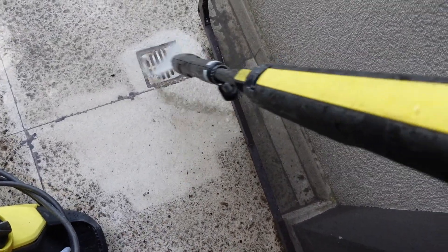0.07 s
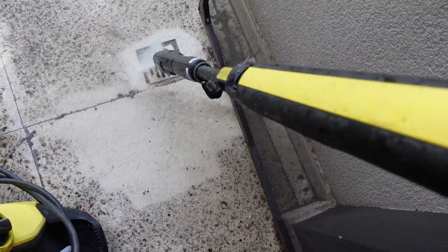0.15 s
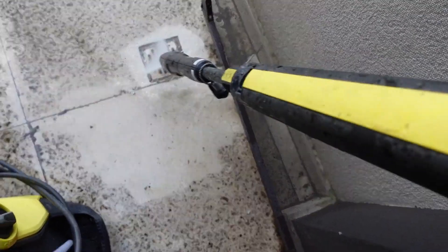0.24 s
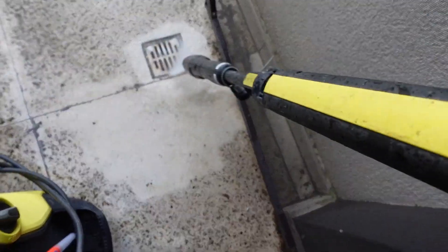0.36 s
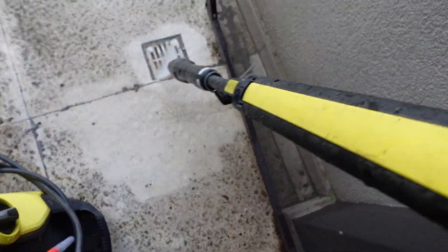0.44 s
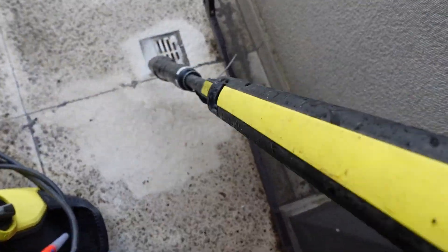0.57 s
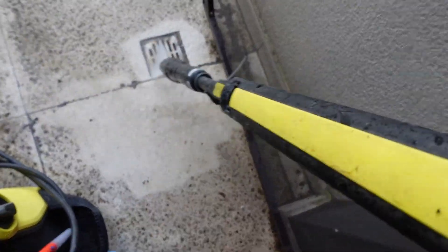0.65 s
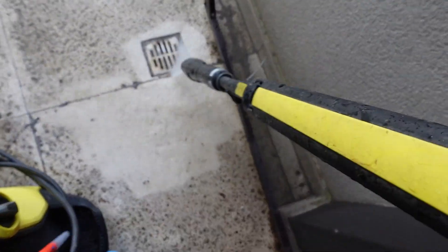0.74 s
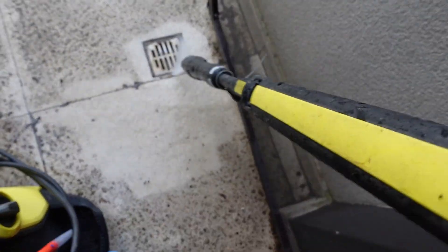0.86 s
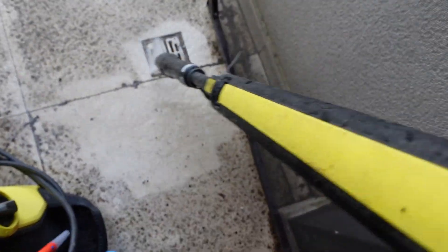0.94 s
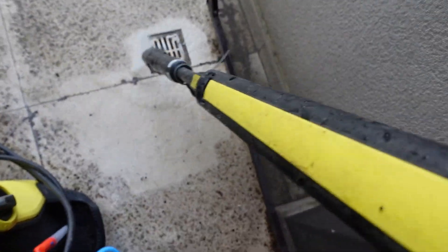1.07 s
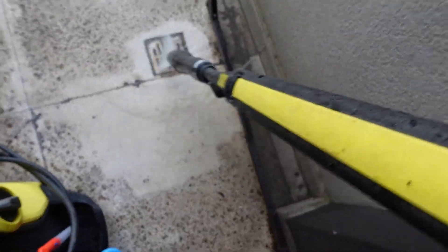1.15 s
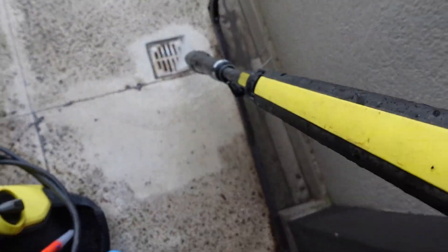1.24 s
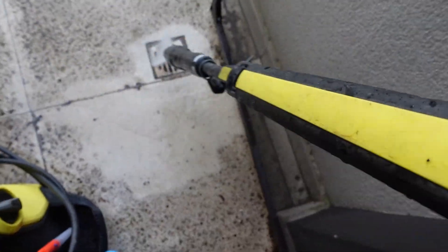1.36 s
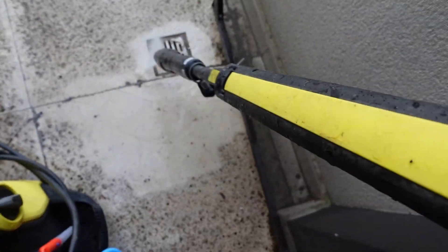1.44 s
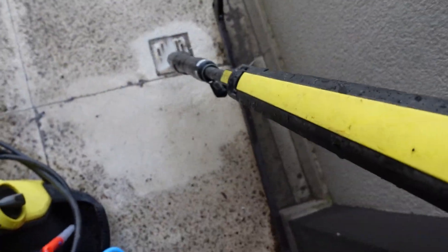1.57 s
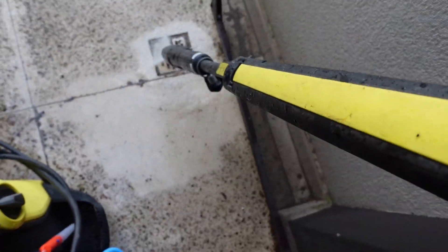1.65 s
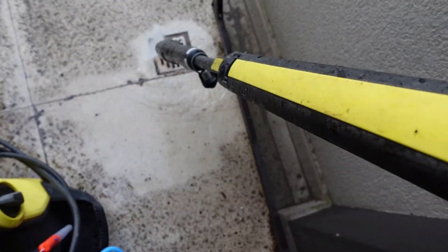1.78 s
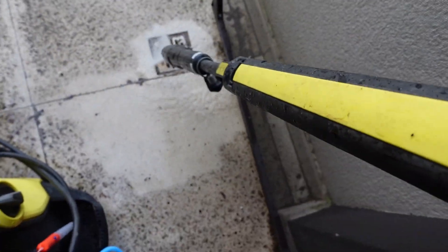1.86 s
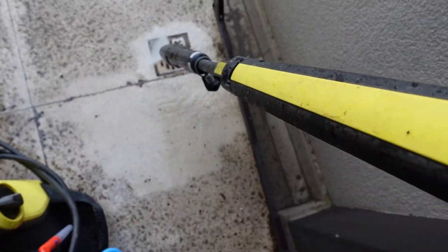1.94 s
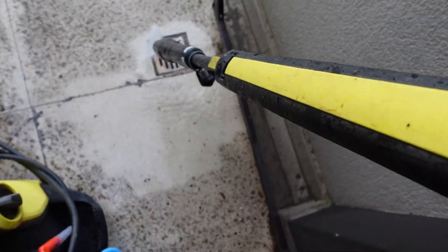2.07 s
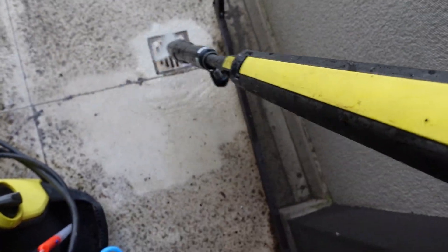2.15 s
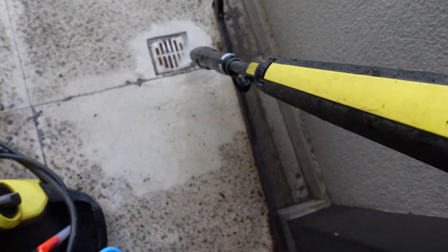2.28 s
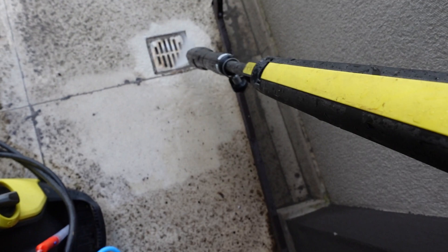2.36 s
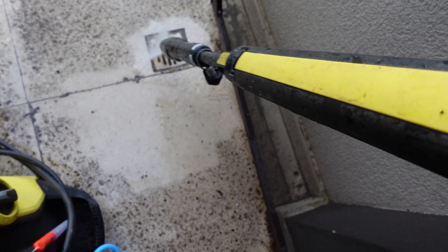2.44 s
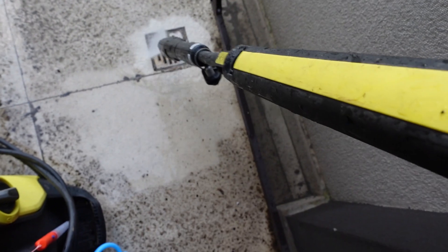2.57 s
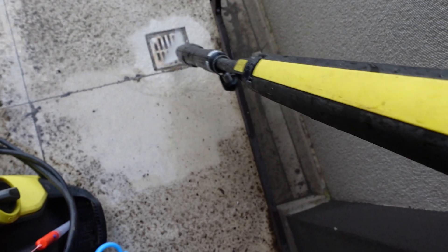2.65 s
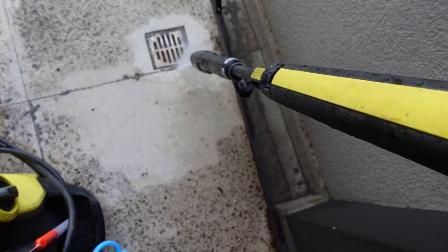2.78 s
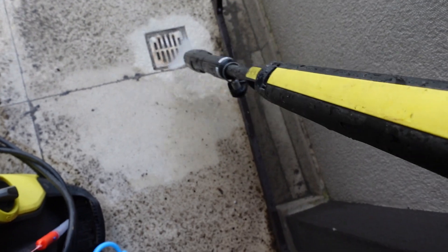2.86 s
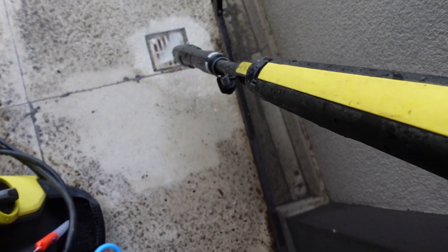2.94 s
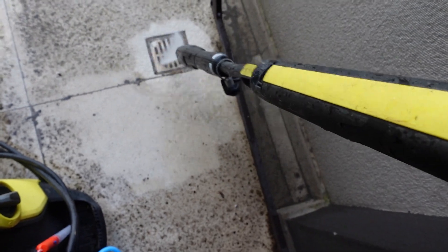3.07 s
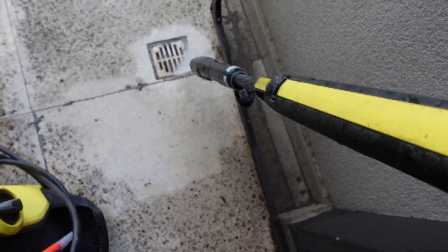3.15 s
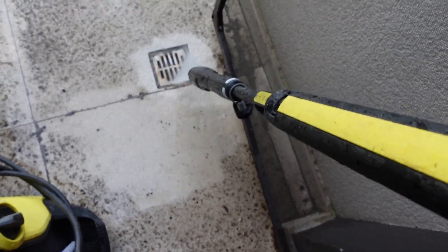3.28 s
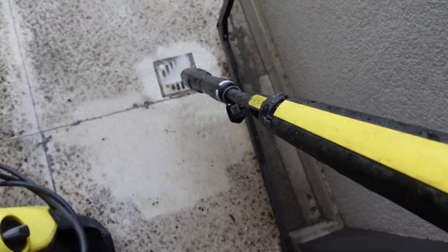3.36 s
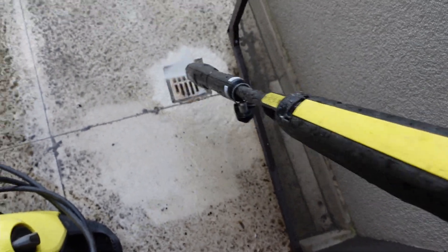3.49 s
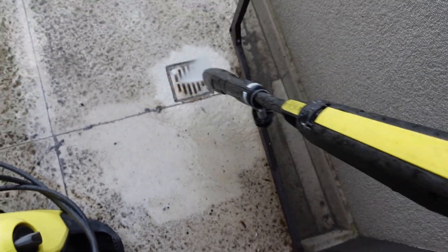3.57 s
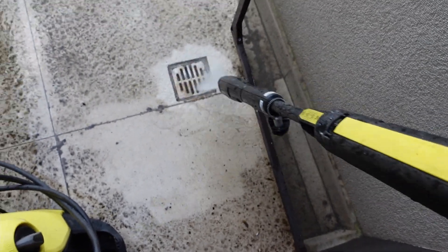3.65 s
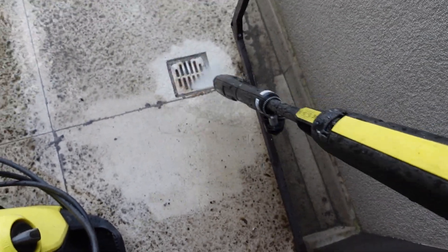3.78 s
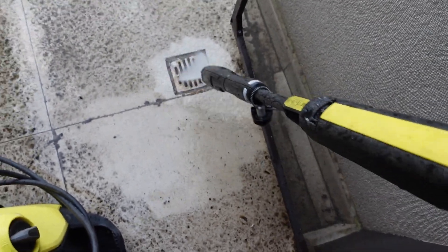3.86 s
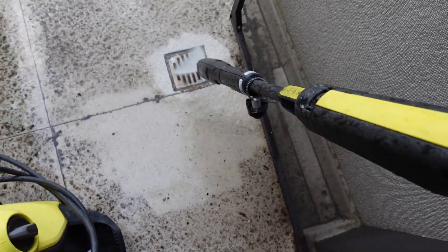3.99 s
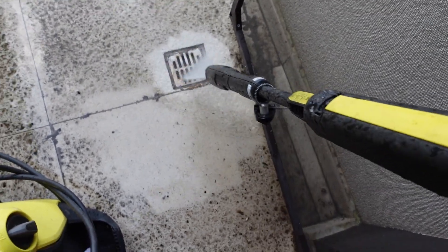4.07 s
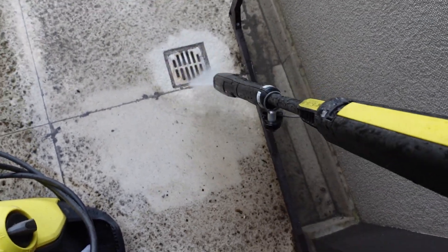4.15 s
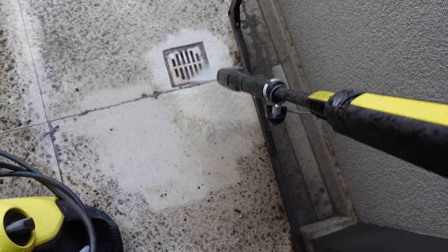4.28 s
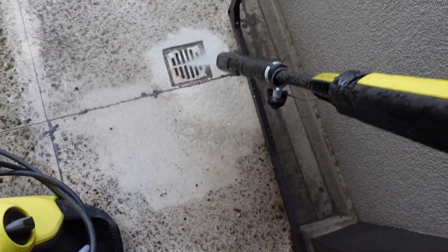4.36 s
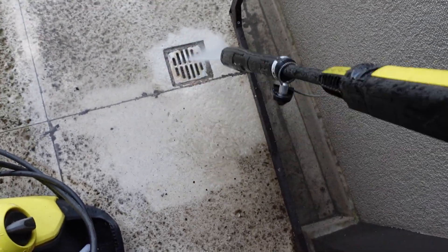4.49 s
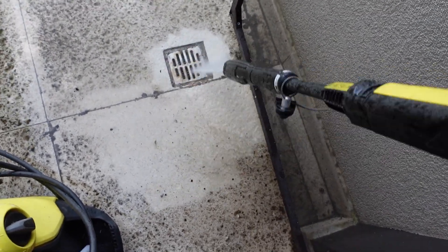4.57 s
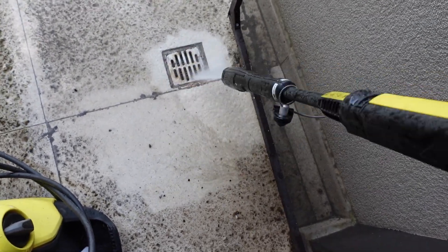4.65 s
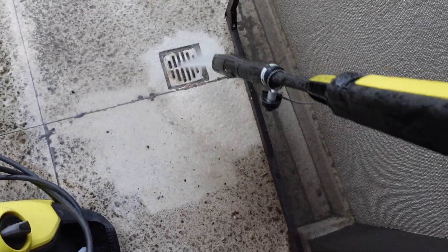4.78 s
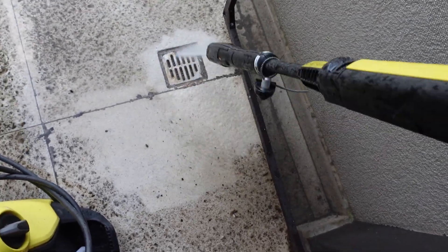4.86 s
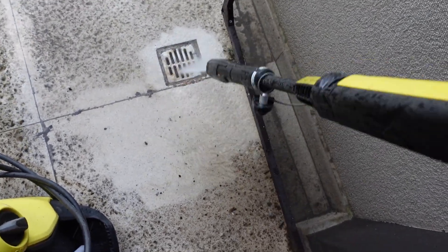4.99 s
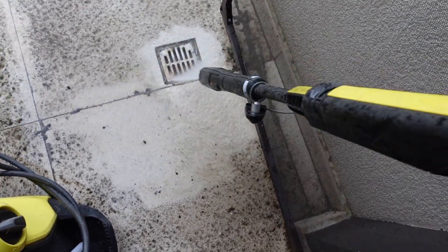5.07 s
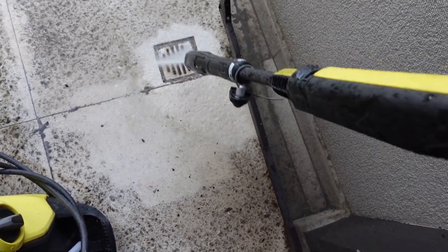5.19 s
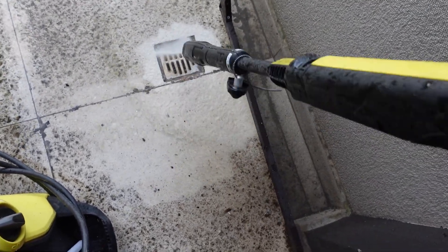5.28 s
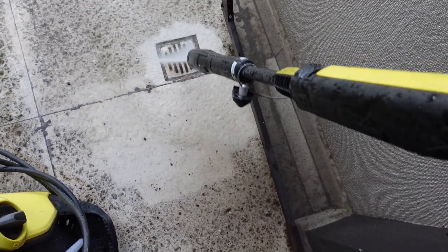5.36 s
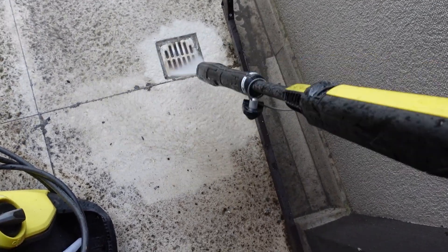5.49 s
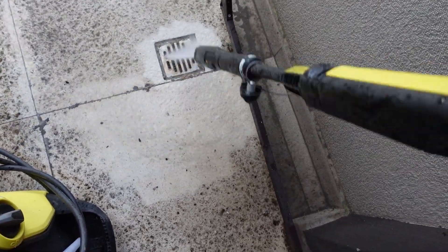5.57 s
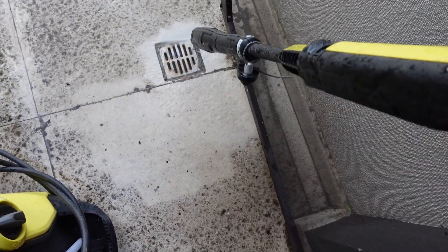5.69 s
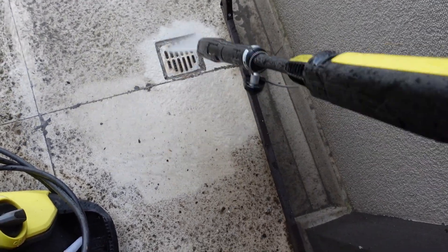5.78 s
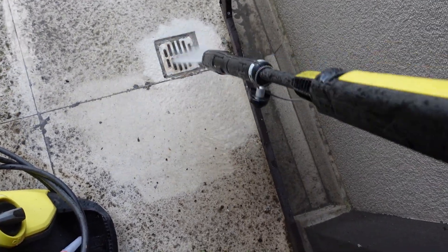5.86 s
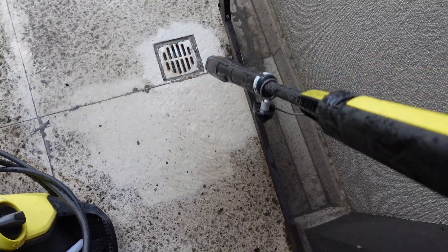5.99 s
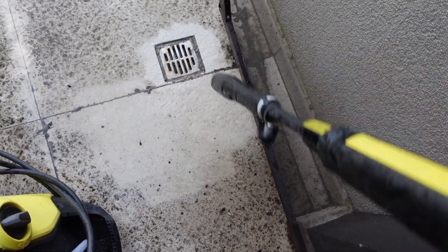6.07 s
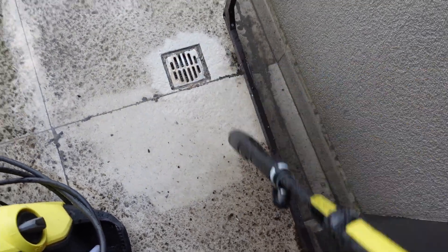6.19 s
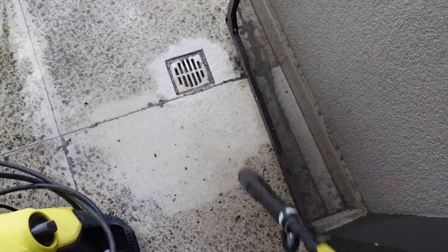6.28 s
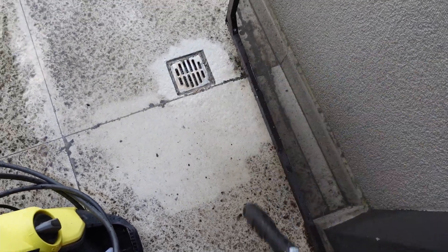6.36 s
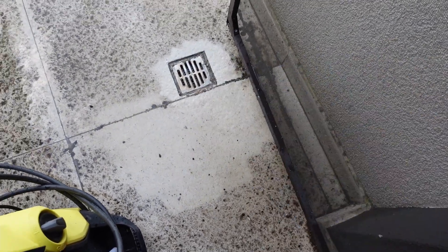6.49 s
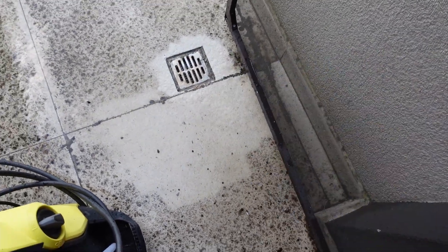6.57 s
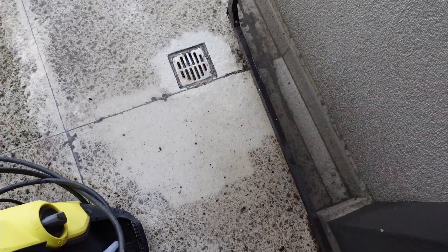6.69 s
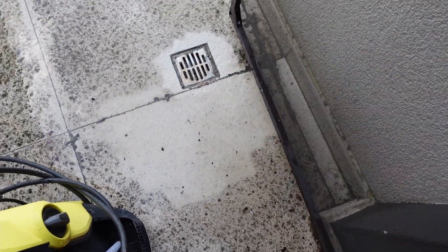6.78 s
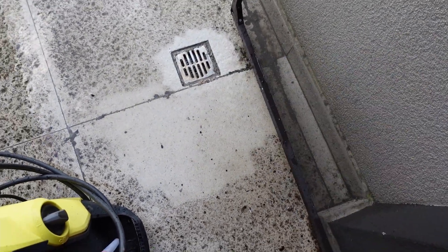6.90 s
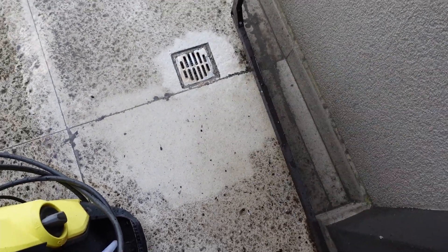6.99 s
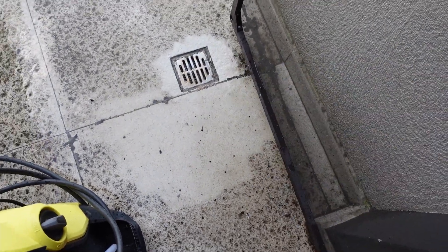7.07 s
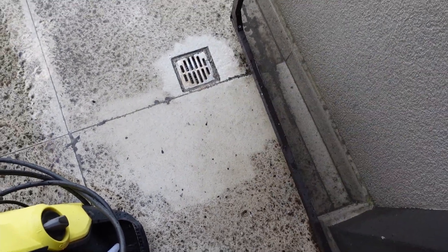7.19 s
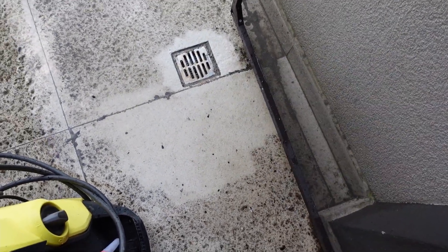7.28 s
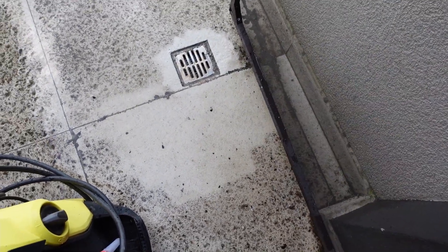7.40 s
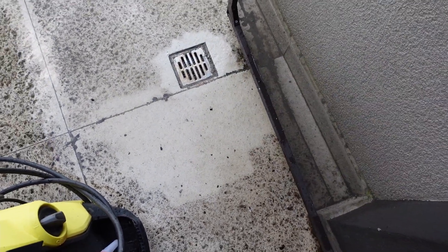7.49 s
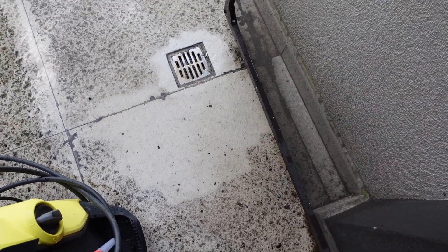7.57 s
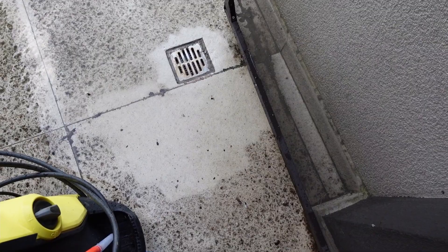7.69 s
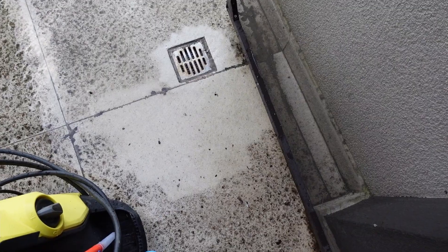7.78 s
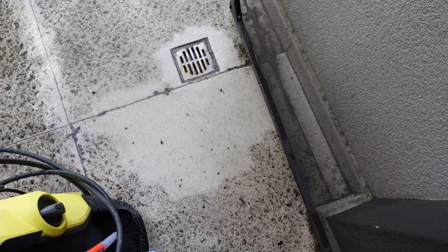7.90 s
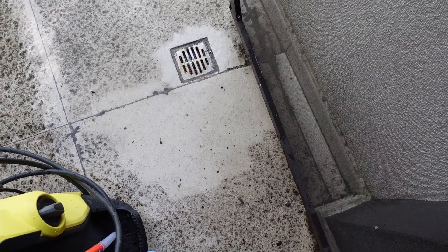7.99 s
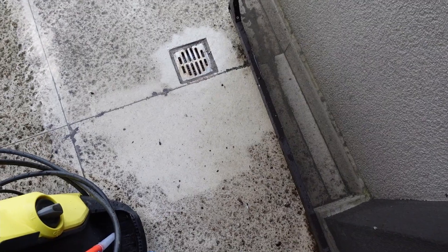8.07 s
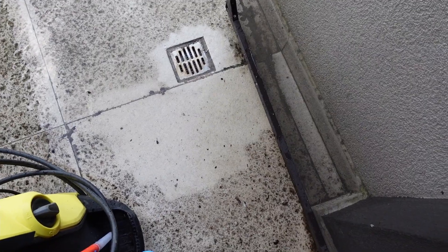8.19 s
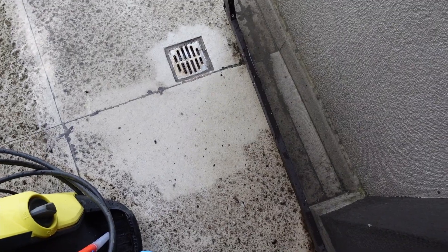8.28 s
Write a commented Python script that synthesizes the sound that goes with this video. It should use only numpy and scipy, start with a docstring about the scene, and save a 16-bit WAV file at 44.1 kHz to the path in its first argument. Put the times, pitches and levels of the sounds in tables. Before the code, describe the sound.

From the start an electric pressure washer runs on a walled outdoor terrace, its pump droning and rattling steadily. Close by, the water jet hisses loudly, its tone shifting as it swings, slapping wet tiles, ringing a drain grate and churning in the drain with low gulps. At about 6 seconds the jet cuts off; the pump hammers for an instant and stops, and the walls echo briefly while water fizzes away. The rest is much quieter. At 6.7 seconds the plastic spray wand knocks with a quick chatter, followed by soft rustling. A soft step comes at 7.2 seconds, one faint drip at 7.7 and a faint airy hiss at 7.9. Around 8.1 seconds the hose coupling gives a few quick, sharp clicks, with two more soft steps. From about 7 seconds a faint distant rumble slowly grows until the end.

```python
"""An electric pressure washer drones and rattles on a walled terrace as its piston pump turns.
Its swinging jet breaks into drops that hiss on the tiles, ring a grate and churn in the drain.
Near six seconds the trigger is let go: the jet cuts off, the pump labours against the shut valve
and stops, and the walls ring out. In the quiet the plastic lance (the spray wand) knocks and the hose
coupling clicks, among soft rustles, a breathy hiss, steps, one drip and a slowly growing far rumble."""
import sys
import numpy as np
from scipy import signal
from scipy.fft import rfft, irfft, next_fast_len
from scipy.io import wavfile
from scipy.ndimage import uniform_filter1d, map_coordinates

SR = 44100
rng = np.random.default_rng(int(sys.argv[2]) if len(sys.argv) > 2 else 0)


def store_wav(level_fs):
    """Save 16-bit WAV to argv[1]."""
    pcm = np.round(np.clip(np.atleast_2d(level_fs), -1, 1) * 32767)
    wavfile.write(sys.argv[1], SR, pcm.T.astype(np.int16))


N = 367794
T = np.arange(N) / SR
RELEASE_S, STALL_S = 5.982, 6.062  # the trigger valve shuts; the pressure switch stops the motor

# the tones of the pump's drone: (pitch [times the shaft speed], level [dB])
PUMP_TONES = [(3, -47.7), (5, -47.5), (6, -31.0), (7, -42.6), (8, -44.8), (9, -33.7), (10, -43.1),
              (11, -31.0), (12, -36.1), (13, -24.5), (14, -35.2), (15, -35.7), (17, -36.5), (18, -34.0),
              (19, -42.5), (21, -44.9), (22, -44.7), (23, -41.6), (24, -41.2), (25, -46.2), (27, -40.7),
              (29, -47.3), (30, -39.7), (31, -46.9), (33, -44.7), (34, -47.4), (35, -45.2), (36, -45.4),
              (37, -47.4), (41, -44.2)]
# mains hum and motor whine: (pitch [Hz], level [dB])
MOTOR_TONES = [(100, -63.5), (200, -46.5), (1526, -53.5), (1907, -43)]
# the pump housing, shaken by the valves: (frequency [Hz], level [dB])
HOUSING_SPECTRUM = [(20, -38.5), (65, -36.5), (110, -22.5), (190, -14), (290, -5), (430, -0.5), (550, 0.5),
                    (680, -5), (1000, -12), (1800, -8.5), (4000, -17), (9000, -30.5), (16000, -43.5)]
# the jet's hiss: (frequency [Hz], level [dB])
HISS_SPECTRUM = [(200, -34.5), (700, -15.5), (1300, -4), (2100, -6), (2450, -5), (3300, 1), (4600, -2),
                 (5400, -2), (7500, -5), (10000, -10), (16000, -29)]
# aiming the lance shifts the hiss between two peaks: (time [s], share of the upper peak [0-1])
HISS_AIM = [(0, 0.5), (.6, 0.5), (.93, 0.2), (1.07, 0.9), (1.8, 0.7), (2.1, 0.8), (3.05, 0.5), (3.95, .3),
            (4.3, 0.8), (4.85, 0.8), (5.35, 0.3), (5.6, .2), (5.82, 0.9)]
# water hitting stone: (frequency [Hz], level [dB])
STONE_SPECTRUM = [(400, -29), (800, 0.5), (1250, 1), (2100, 0), (2400, -6.5), (4000, -21.5)]
# the jet slaps squarely on wet stone: (middle time [s], length [s], level [dB])
STONE_SLAPS = [(.35, .16, -27), (1.61, 0.15, -22), (2.27, 0.34, -26), (2.65, 0.13, -26.5),
               (3.06, 0.23, -22), (3.95, 0.38, -25)]
# the ringing slots of the grate: (pitch [Hz], width [Hz], level [dB])
GRATE_RING = [(2810, 290, 0)]
# the jet crosses the grate: (middle time [s], length [s], level [dB])
GRATE_CROSSINGS = [(.65, .2, -25), (1.03, .16, -22.5), (1.52, 0.45, -23), (1.88, 0.37, -24),
                   (2.17, .16, -23.5), (2.58, .24, -22), (3.04, .22, -25.5), (3.5, .12, -28.5),
                   (4.05, .14, -30.5), (4.86, .1, -27), (5.45, .14, -30.5), (5.86, .1, -29)]
# the finest spray: (frequency [Hz], level [dB])
SPRAY_SPECTRUM = [(4000, -29.5), (8000, -2), (10000, 0), (13000, -0.5), (16000, -16.5)]
# the shape of the spray's rise and fall: (time [s], level [dB])
SPRAY_SHAPE = [(0.0, -26), (0.11, -29.5), (0.78, -28), (3.91, -30.5), (4.57, -26), (5.5, -29.5),
               (5.75, -26.5), (5.95, -27.5)]
# the hollow of the drain: (pitch [Hz], width [Hz], level [dB])
DRAIN_RING = [(407, 130, 0.5), (550, 190, -1.5)]
# water plunges into the drain with a low gulp: (middle time [s], length [s], level [dB])
DRAIN_GULPS = [(.2, 0.41, -23.5), (.98, 0.07, -28.5), (1.39, 0.043, -18.5), (1.69, 0.089, -23),
               (1.96, .08, -20), (2.17, 0.037, -22.5), (2.51, 0.046, -22), (2.9, .06, -23.5),
               (3.42, 0.1, -22), (3.65, 0.12, -25.5), (3.98, 0.19, -22), (4.23, .06, -24),
               (4.91, .08, -23.5), (5.3, 0.15, -21.5), (5.68, .08, -23.5), (5.82, 0.066, -25)]
# a piston stroke against the shut valve: (frequency [Hz], level [dB])
STROKE_SPECTRUM = [(40, -43.5), (75, -31), (120, -11.5), (250, 0), (520, 2.5), (800, -2), (1500, -7.5),
                   (4000, -31.5), (12000, -54)]
# water fizzing away over the tiles: (pitch [Hz], width [Hz], level [dB])
FIZZ_BAND = [(3900, 2400, 0)]
# how long the terrace walls echo: (frequency [Hz], time to fade by 60 dB [s])
WALL_FADES = [(100, .55), (500, .5), (2000, .55), (5000, .5), (8000, .38), (11000, .27), (15000, .18)]
# the plastic lance: (pitch [Hz], width [Hz], level [dB])
LANCE_RING = [(420, 120, -2), (850, 350, -4), (1180, 260, -2), (1480, 420, 0), (2380, 500, -9),
              (3800, 1600, -13), (6800, 3000, -27)]
# rustles and a breathy hiss: (start [s], time to fade by 60 dB [s], level [dB], pitch [Hz], width [Hz])
SWISHES = [(6.71, 1.23, -54.5, 1750, 3000), (7.42, 1.25, -61.5, 4270, 3000), (7.87, .5, -52, 1490, 1415)]
# soft steps: (time [s], level [dB])
STEPS = [(7.247, -52), (8.075, -55), (8.175, -50)]
# the slab underfoot: (pitch [Hz], width [Hz], level [dB])
SLAB_RING = [(110, 26, -6), (185.7, 75, -5)]
# a drop lands on wet stone: (time [s], level [dB])
DRIP_TICKS = [(7.694, -60.5)]
# clicks of the hose coupling: (time [s], level [dB])
COUPLING_CLICKS = [(8.112, -38.5), (8.143, -41), (8.147, -33)]
# the hose coupling: (pitch [Hz], width [Hz], level [dB])
COUPLING_RING = [(1120, 330, -1), (1950, 260, 2), (2140, 70, 5.5), (3620, 260, -8), (4720, 250, -8),
                 (6600, 350, -12)]
# a deep, distant rumble: (frequency [Hz], level [dB])
RUMBLE_SPECTRUM = [(20, -14), (60, -8.5), (105, 5), (160, 1), (260, -3), (330, -11.5), (600, -47)]
# the rush of far-off surroundings: (frequency [Hz], level [dB])
RUSH_SPECTRUM = [(150, -11.5), (400, -2.5), (700, -1), (950, 2), (1400, -2.5), (2100, -3.5), (3000, -12.5),
                 (5000, -21.5), (6500, -30), (10000, -42.5), (15000, -51.5)]
# a far hum comes and goes: (middle time [s], length [s], level [dB])
FAR_HUMS = [(7.29, 0.16, -61.5), (7.62, 0.51, -64.5), (8.22, 0.23, -59)]
# how alike the two ears hear a sound: (frequency [Hz], likeness [0-1])
EAR_LIKENESS = [(200, 1), (380, .985), (950, .94), (2400, .93), (6000, .89), (15000, .8)]
# how the two microphones differ: (frequency [Hz], left minus right [dB])
MIC_BALANCE = [(200, 0), (300, -.7), (650, 1.2), (1200, -.4), (3500, -1), (6500, -2), (12000, 1),
               (16000, 1.2)]


def amp(db):
    """Turn decibels into a number to multiply by."""
    return 10 ** (np.asarray(db) / 20)


def unit(x):
    """Scale a sound to an average (rms) strength of 1."""
    return x / np.sqrt(np.mean(x ** 2) + 1e-20)


def along(points, hz):
    """Read between (frequency, value) points, giving each octave about equal room."""
    freqs, values = np.transpose(points)
    return np.interp(np.log(hz + 1), np.log(freqs + 1), values)


def wobble(rate):
    """A smooth random curve through `rate` random values a second."""
    knots = rng.standard_normal(int(N * rate / SR) + 4)
    places = np.arange(0, len(knots) - 1, 1 / 8)
    return np.interp(T * rate, places, map_coordinates(knots, [places]))


def until(stop, t60):
    """Full level up to `stop`, then a fade of 60 dB every t60 seconds."""
    return amp(-60 * np.maximum(T - stop, 0) / t60)


def swells(rows):
    """A loudness curve of smooth bumps; each one's length is taken at half its height."""
    t = T[::SR // 1000]
    power = sum(amp(db) ** 2 * .5 ** (2 * (2 * (t - s) / length) ** 2) for s, length, db in rows)
    return np.interp(T, t, np.sqrt(power + 1e-20))


def filtered(x, response):
    """Turn each frequency of x up or down as the filter `response` says."""
    size = next_fast_len(N + SR // 2)
    return irfft(rfft(x, size) * response(np.fft.rfftfreq(size, 1 / SR)), size)[..., :N]


def colour(points):
    """A filter that follows a spectrum table."""
    return lambda hz: amp(along(points, hz))


def body(rings, passes=1):
    """A filter for an object that rings at a few pitches; a second pass steepens the peaks."""
    return lambda hz: sum((-1) ** k * amp(db) * 1j * hz * width / (pitch**2 - hz**2 + 1j * hz * width)
                          for k, (pitch, width, db) in enumerate(rings)) ** passes


def ears(hz):
    """How much the ears share (mid) and differ (side): bass is alike in both, treble less so."""
    turn = np.arccos(np.clip(along(EAR_LIKENESS, hz), -1, 1)) / 2
    return np.array([np.cos(turn), np.sin(turn)])


def noise(response, drive=1):
    """Stereo noise of strength 1, made to flutter by `drive` and then filtered."""
    mid, side = filtered(drive * rng.standard_normal((2, N)), lambda hz: response(hz) * ears(hz))
    return unit(np.array([mid + side, mid - side]))


def struck(events, response, contact_s):
    """Short scuffs make an object ring, one for each (time, peak level) event."""
    out, t = np.zeros(N + SR), np.arange(SR // 4) / SR
    gain = response(np.fft.rfftfreq(len(t), 1 / SR))
    lead = SR // 100
    for s, db in events:
        force = np.roll(rng.standard_normal(len(t)) * amp(-60 * t / contact_s), lead)
        ring = irfft(rfft(force) * gain, len(t))
        out[round(s * SR) - lead:][:len(t)] += amp(db) * ring / np.abs(ring).max()
    return out[:N]


def pump(shaft_hz=46.5, rattle_db=-24.5, left_lead_s=.00008):
    """The shaft and motor drone, while the valves rattle the housing in two swells a turn."""
    speed = shaft_hz + .04 * wobble(3)
    angle = 2 * np.pi * np.cumsum(speed) / SR
    ear_angle = angle + np.pi * shaft_hz * left_lead_s * np.array([[1], [-1]])  # it stands to the left
    tone = lambda phase, db: np.sqrt(2) * amp(db + wobble(7)) * np.sin(phase)
    # the tones tend to crest together on each stroke; the housing scatters their timing
    drone = sum(tone(round(k) * ear_angle + rng.normal(0, 1), db) for k, db in PUMP_TONES)
    motor = sum(tone(2 * np.pi * hz * T, db) for hz, db in MOTOR_TONES)
    valves = amp(4 * np.cos(2 * angle) + 1.3 * np.cos(4 * angle))
    rattle = amp(rattle_db + .6 * wobble(9)) * noise(colour(HOUSING_SPECTRUM), valves)
    return (drone + motor) * until(STALL_S, t60=.18), rattle * until(STALL_S, t60=.04)


def swing(hiss, peaks_hz=(3430, 4420), width_hz=270, peak_db=4.4, patchy_db=.7):
    """As the jet swings, two peaks in its hiss take turns and random patches come and go."""
    hz, t, spectrum = signal.stft(hiss, SR, nperseg=512)
    share = np.interp(t, *np.transpose(HISS_AIM))
    lower, upper = [1 / (1 + ((hz[:, None] - centre) / width_hz) ** 2) for centre in peaks_hz]
    peak = (1 - share) * lower + share * upper
    patches = uniform_filter1d(rng.standard_normal(spectrum.shape[1:]), size=5, axis=0)
    patches = unit(uniform_filter1d(patches, size=30, axis=1))
    spectrum *= amp(peak_db * peak + patchy_db * patches)
    return unit(signal.istft(spectrum, nperseg=512)[1][:, :N])


def jet(hiss_db=-17, stone_db=-24, grate_db=-32, spray_db=-34, churn_db=-34):
    """The jet breaks into drops on the stone, rings the grate as it crosses and churns the drain."""
    drops = amp(wobble(900) + .44 * wobble(25))
    hiss = amp(hiss_db + .54 * wobble(7.3)) * swing(noise(colour(HISS_SPECTRUM), drops))
    on_grate = swells(GRATE_CROSSINGS)
    missed_db = 4 * on_grate / on_grate.max()  # what falls through the grate misses the stone
    on_stone = amp(stone_db - missed_db + 1.1 * wobble(8))
    stone = np.hypot(on_stone, swells(STONE_SLAPS)) * noise(colour(STONE_SPECTRUM), drops)
    grate_level = np.hypot(amp(grate_db), on_grate) * amp(.9 * wobble(30))
    grate = grate_level * noise(body(GRATE_RING, passes=2), drops)
    shape = np.interp(T, *np.transpose(SPRAY_SHAPE))
    spray_level = amp(spray_db + 2.2 * (shape - shape.mean()) + .8 * wobble(5))
    spray = spray_level * noise(colour(SPRAY_SPECTRUM), drops)
    churn_level = np.hypot(amp(churn_db + 3 * wobble(12)), swells(DRAIN_GULPS))
    churn = churn_level * noise(body(DRAIN_RING, passes=2))
    # the jet stops at once, but drops still in flight go on landing
    flow = until(RELEASE_S, t60=.012)
    landing = (1 - flow) * until(RELEASE_S, t60=.3) * (amp(-7) * hiss + amp(-3) * spray)
    return (hiss + stone + grate + spray + churn) * flow + landing


def labouring_pump(gap_s=.01, peak_pressure_s=6.043, peak_db=-7.5, fall_db_per_s=70, snap_db=-11):
    """The valve snaps shut; pistons hammer it harder as pressure builds, then fade as the motor stalls."""
    times = np.arange(STALL_S - gap_s / 2, RELEASE_S, -gap_s)
    strokes = [(s, peak_db - fall_db_per_s * abs(s - peak_pressure_s)) for s in times]
    snap = (RELEASE_S - .005, snap_db)
    return struck([snap] + strokes, colour(STROKE_SPECTRUM), contact_s=.027)


def run_off(level_db=-52):
    """Water fizzes over the tiles and dies away once the jet has stopped."""
    level = amp(level_db + 1.5 * wobble(120)) * until(RELEASE_S, t60=1.5)
    return level * noise(body(FIZZ_BAND, passes=2))


def wall_echoes(x, patterns=20):
    """The walls ring, each frequency fading at its own speed; the echoes drift as the listener moves."""
    out = np.zeros((2, N))
    for weight in np.eye(patterns):
        hz, t, spectrum = signal.stft(rng.standard_normal((2, SR * 3 // 4)), SR, nperseg=256)
        fade = amp(-60 * t / along(WALL_FADES, hz)[:, None])
        mid, side = signal.istft(spectrum * ears(hz)[:, :, None] * fade, SR, nperseg=256)[1]
        tail = np.pad([mid + side, mid - side], ((0, 0), (SR // 200, 0)))  # arrives 5 ms late
        tail /= np.linalg.norm(tail[0])
        # each echo pattern takes one stretch of the sound and blends into the next
        share = np.sqrt(np.interp(T, np.linspace(0, T[-1], patterns), weight))
        start, end = np.flatnonzero(share)[[0, -1]]
        echo = signal.fftconvolve((x * share)[:, start:end], tail, axes=1)[:, :N - start]
        out[:, start:start + echo.shape[1]] += echo
    return out


def lance_knock(start_s=6.701, level_db=-27.5, gap_s=.011, loss_db=4, soft_hz=3900):
    """The lance knocks with a quick chatter of bounces; the plastic gives way, softening the sound."""
    bounces = [(start_s + gap_s * k, level_db - loss_db * k) for k in range(5)]
    return struck(bounces, lambda hz: body(LANCE_RING)(hz) / (1 + 1j * hz / soft_hz) ** 2, contact_s=.014)


def swishes(rise_s=.05, top_hz=6000):
    """Soft, dull rustles and a faint, breathy hiss start quickly and fade, with little treble."""
    out = np.zeros((2, N))
    for start, t60, db, pitch, width in SWISHES:
        level = np.clip((T - start) / rise_s, 0, 1) * until(start, t60) * amp(db + 1.2 * wobble(200))
        band = body([(pitch, width, 0)], passes=2)
        out += level * noise(lambda hz: band(hz) / (1 + (hz / top_hz) ** 8))
    return out


def surroundings(rumble_db=-66.5, rush_db=-68, grow_from_s=6.98, hum_hz=496):
    """A distant rumble and rush grow steadily in the quiet, and a faint hum comes and goes."""
    elapsed = np.maximum(T - grow_from_s, 0)
    rumble = amp(rumble_db + 7.5 * elapsed) * noise(colour(RUMBLE_SPECTRUM))
    rush = amp(rush_db + 10 * elapsed + .7 * wobble(5.9)) * noise(colour(RUSH_SPECTRUM))
    hum = swells(FAR_HUMS) * noise(body([(hum_hz, 40, 0)], passes=2))
    return rumble + rush + hum


def footsteps():
    """Soft steps thump the slab."""
    return struck(STEPS, body(SLAB_RING, passes=2), contact_s=.03)


def drip(pitch_hz=8800, width_hz=3500):
    """One drop ticks on wet stone."""
    return struck(DRIP_TICKS, body([(pitch_hz, width_hz, 0)], passes=2), contact_s=.043)


def coupling_clicks(top_hz=8000):
    """Very short taps ring the hose coupling."""
    response = lambda hz: body(COUPLING_RING)(hz) / (1 + (hz / top_hz) ** 4)
    return struck(COUPLING_CLICKS, response, contact_s=.0033)


def scene():
    """Mix the pump, the water and the small closing sounds with their echoes and the surroundings."""
    drone, rattle = pump()
    machine = rattle + labouring_pump()
    water = jet()
    small_sounds = lance_knock() + coupling_clicks() + drip() + swishes() + footsteps()
    echoes = wall_echoes(amp(-7.5) * machine + amp(-14) * water + amp(-6) * small_sounds)
    direct = drone + amp(-.5) * machine + amp(-.69) * water + run_off() + small_sounds
    return direct + echoes + surroundings()


def record(dry, ceiling=.9, top_hz=15900):
    """Two microphones differ a little in tone; tall peaks are rounded and the highest treble is cut."""
    heard = filtered(dry, lambda hz: amp(np.outer([1, -1], along(MIC_BALANCE, hz)) / 2))
    rounded = heard / (1 + (heard / ceiling) ** 8) ** (1 / 8)
    treble_cut = lambda hz: np.cos(np.pi / 2 * np.clip((hz - top_hz) / 200 + .5, 0, 1)) ** 2
    return filtered(rounded, treble_cut)


dry = scene()
out = record(dry)
store_wav(out)
```